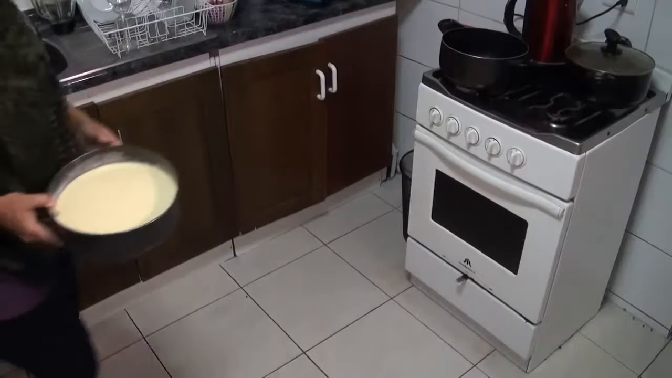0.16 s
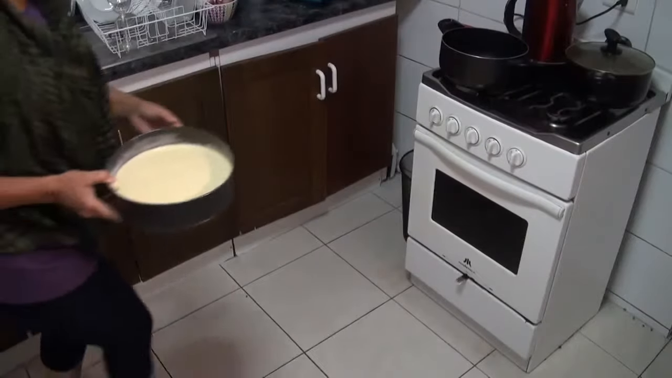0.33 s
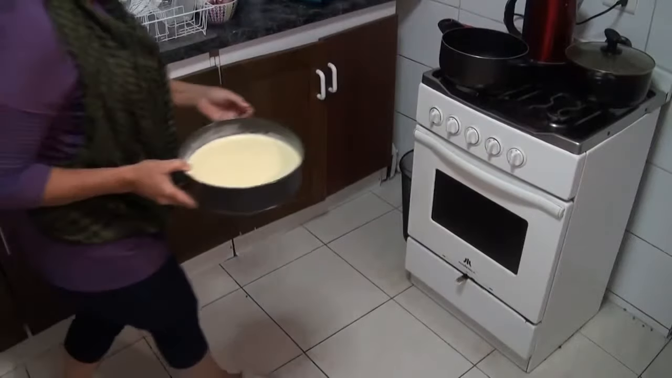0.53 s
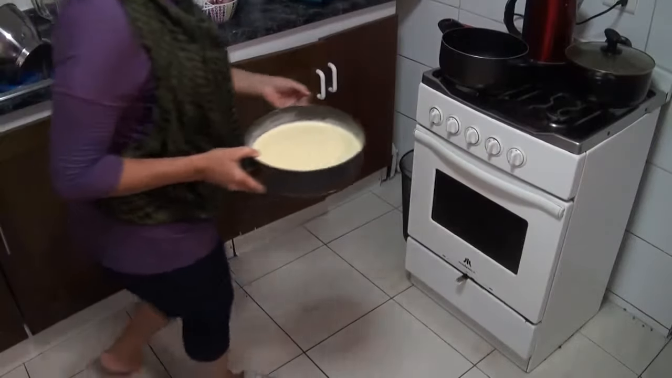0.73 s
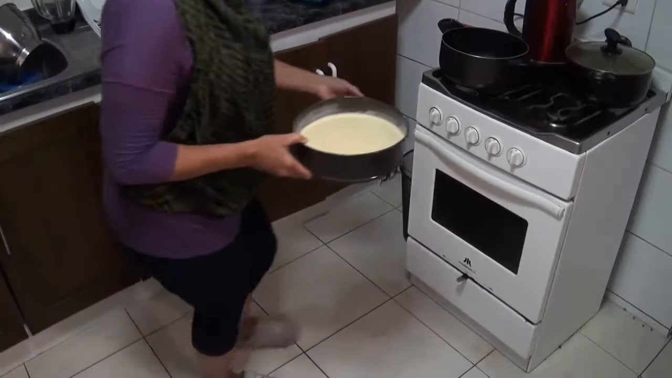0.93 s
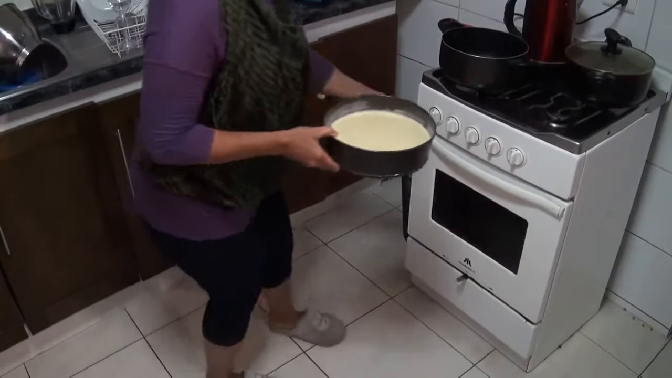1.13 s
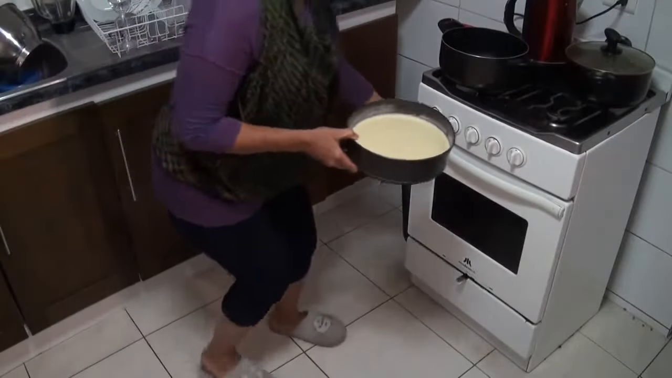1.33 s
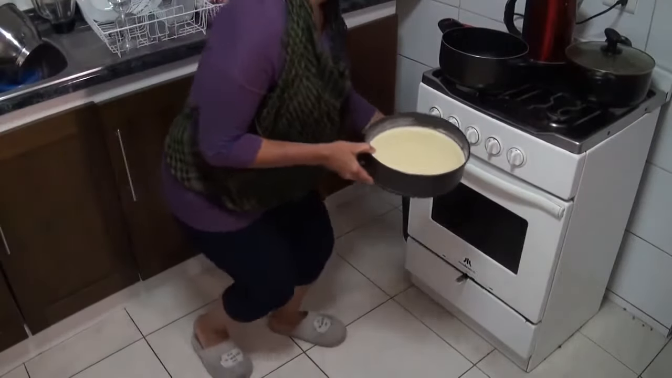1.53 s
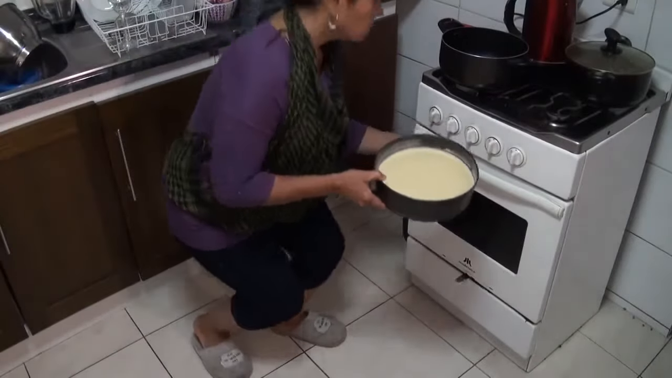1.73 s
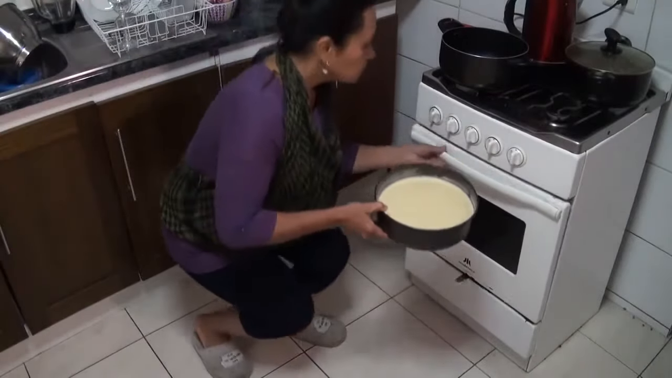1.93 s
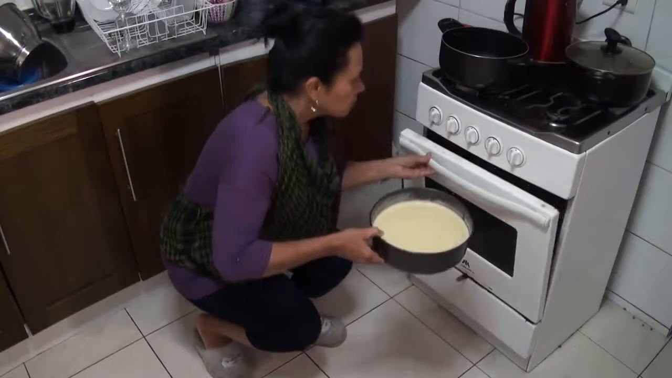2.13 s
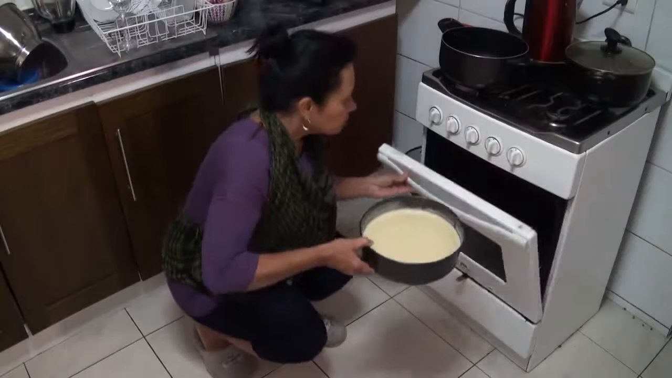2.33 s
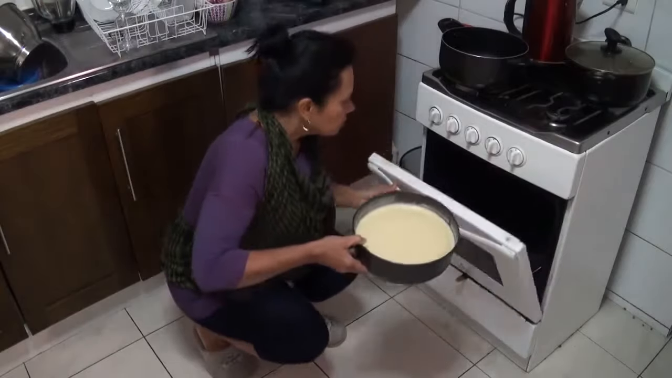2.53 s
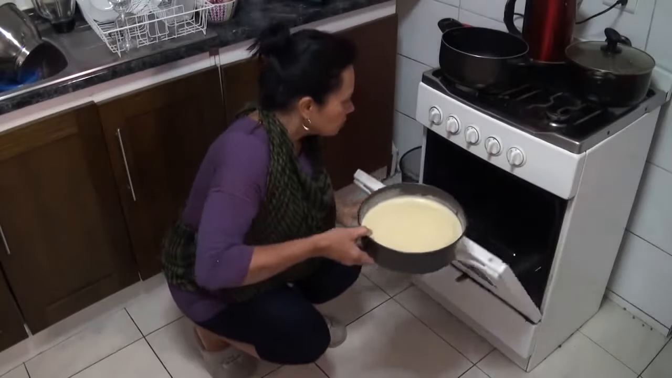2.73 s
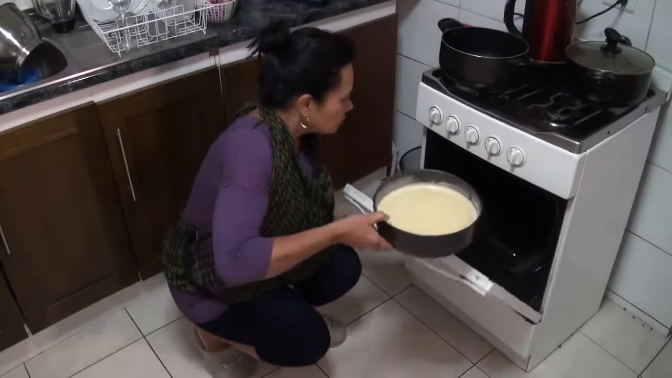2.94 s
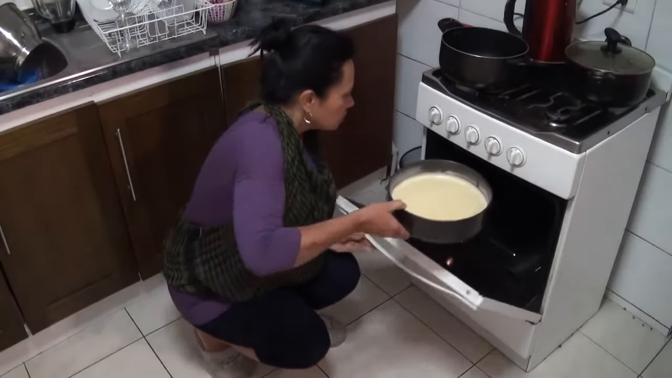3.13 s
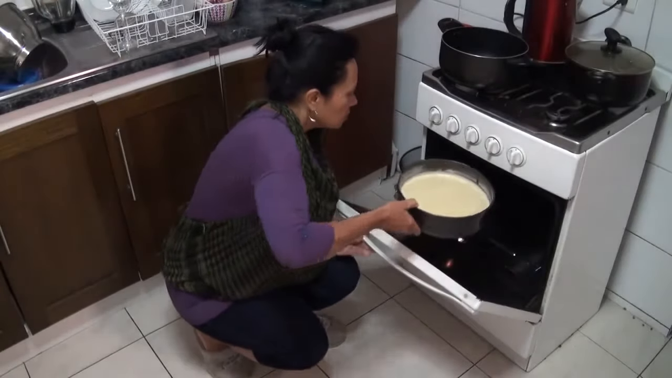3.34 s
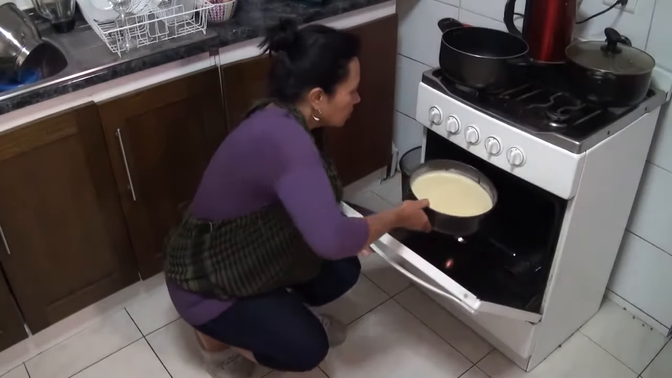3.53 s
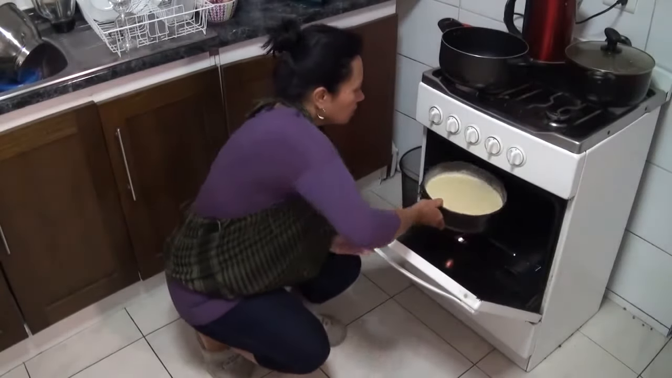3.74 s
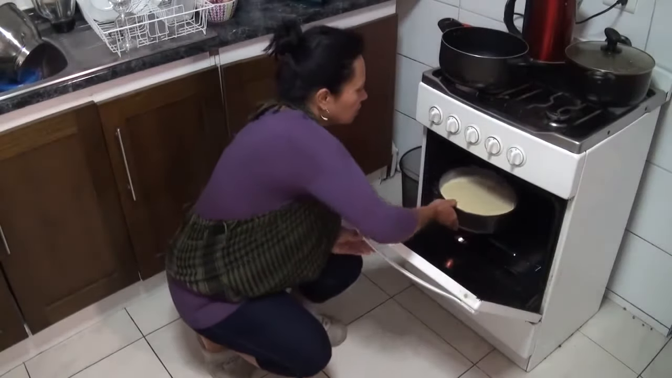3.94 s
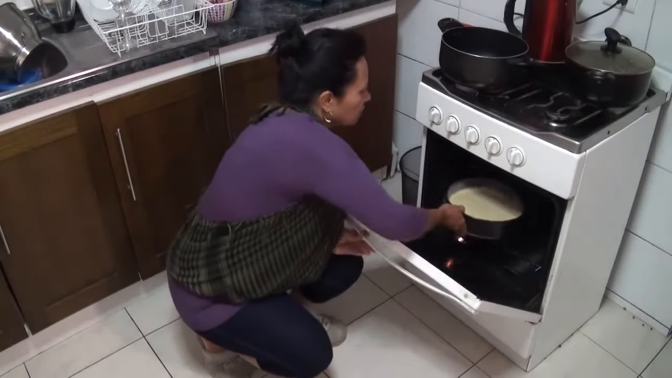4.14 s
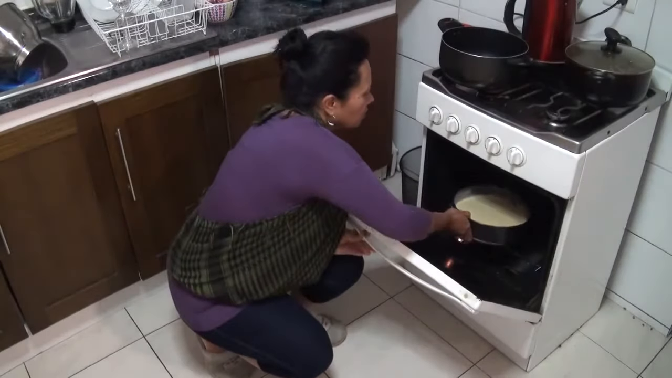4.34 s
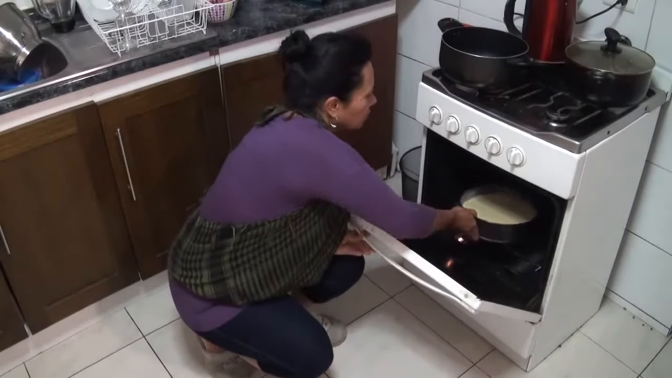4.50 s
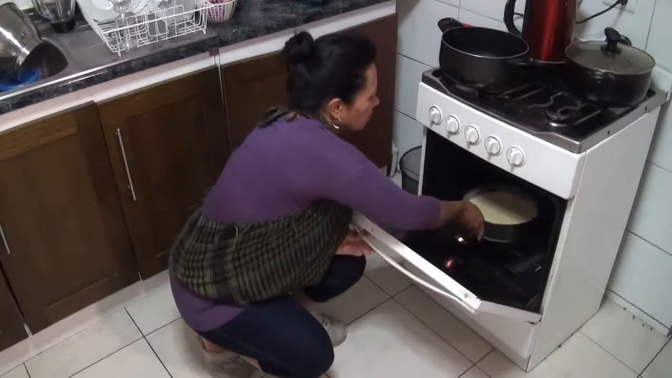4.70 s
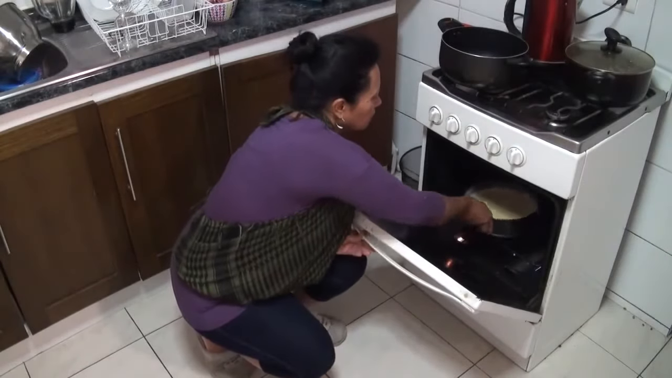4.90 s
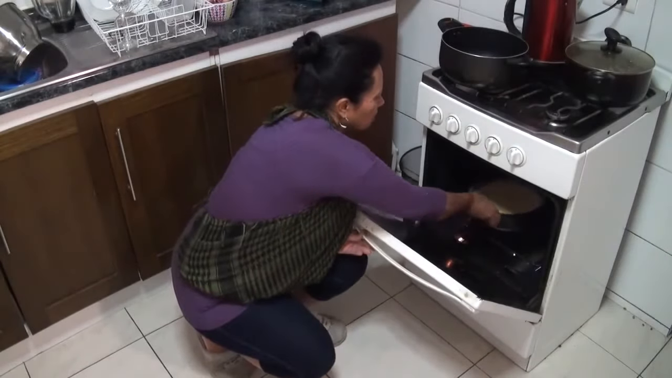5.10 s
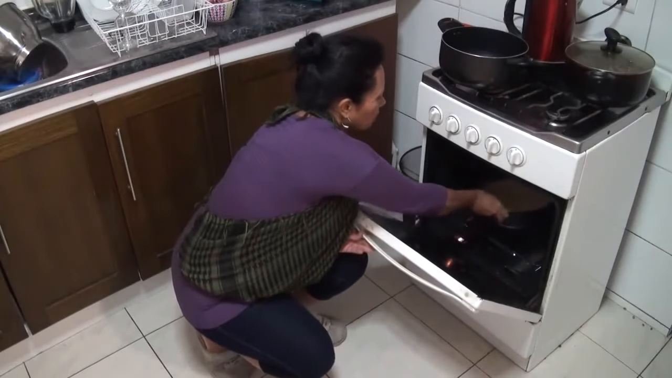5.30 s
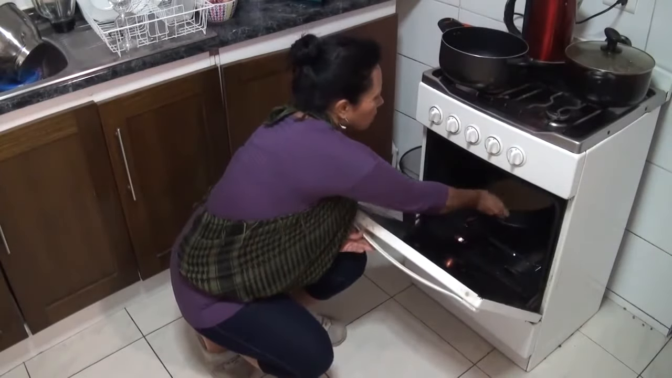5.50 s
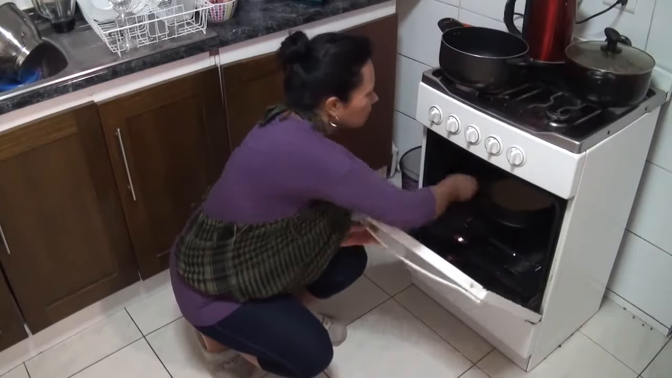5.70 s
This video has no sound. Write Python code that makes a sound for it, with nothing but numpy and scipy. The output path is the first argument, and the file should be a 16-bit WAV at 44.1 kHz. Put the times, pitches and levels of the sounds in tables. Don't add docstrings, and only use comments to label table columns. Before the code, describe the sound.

Gritty footsteps approach a stove, its dry oven hinge shrieks in broken bursts, and after a pause a cake pan knocks and grates along wire bars.

```python
import sys
import numpy as np
from scipy import signal
from scipy.fft import rfft, irfft, next_fast_len
from scipy.io import wavfile
from scipy.ndimage import uniform_filter1d

SR = 44100
rng = np.random.default_rng(int(sys.argv[2]) if len(sys.argv) > 2 else 0)


def volts_from_db(level):
    exponent = np.asarray(level, float) / 20
    return 10 ** exponent


def waveform_to_disk(signal):
    frames = np.transpose(np.atleast_2d(signal))
    scaled = np.clip(frames, -1, 1) * 32767
    samples = np.round(scaled).astype(np.int16)
    wavfile.write(sys.argv[1], SR, samples)


N = 258381
T = np.arange(N) / SR

# [f/Hz, level/dB per Hz]
AIR_HZ = [(12, -33), (20, -6.5), (55, -15.5), (76, -17.5), (141, -24), (209, -25.5), (317, -26), (431, -31),
          (693, -34), (1250, -35.5), (2000, -37.5), (3700, -39.5), (15800, -47.5)]
# [f/Hz, level/dB per Hz]
SIDE_HZ = [(12, -32.5), (20, 0.5), (123, -3.5), (419, -18), (1650, -40), (1790, -47.5), (2960, -36.5),
           (13700, -28), (15800, -27.5)]
# [t/s, level/dB]
GAIN = [(0, -62), (2.2, -59), (2.6, -59), (3.6, -63.5), (4.4, -64), (5.86, -60.5)]
# [f/Hz, t60/s]
ROOM = [(200, 0.38), (900, 0.38), (4000, 0.35), (9000, 0.31), (15000, 0.33)]

# [t/s, time to die 20 dB/s, floor level/dB, cabinet level/dB]
BOOM = [(.24, .5, -46, -57), (.645, .3, -33, -50), (.77, .2, -33, -54), (.94, .5, -37, -52),
        (1.15, .6, -44, -60), (1.45, .5, -52, -52), (1.68, .8, -44, -55), (2.0, .15, -45, -49),
        (2.25, .3, -46, -50), (2.4, .2, -35, -38), (2.58, .9, -42, -52), (3.0, .9, -49, -52),
        (3.5, .5, -58, -52), (3.87, .4, -50, -62), (4.92, .25, -42, -44), (5.14, .3, -49, -42),
        (5.5, .5, -48, -51), (5.84, .3, -46, -46)]
# [f/Hz, width/Hz]
BOOM_MODES = [(47, 2.7), (144, 6), (7, 5.9)]
# [start t/s, length/s, first f/Hz, last f/Hz, level/dB]
CABINET = [
    (.04, .18, 109.4, 108.4, -44),
    (.2, .12, 108.6, 108.8, -36),
    (.31, .16, 106.5, 104.5, -47),
    (0, .6, 270, 262, -56),
]
# [f/Hz, level under the note/dB]
PANEL = [(215, -22), (325, -36), (430, -50)]
LEAN_SHARE, DRIFT_DB = .4, -42

# [t/s, peak level/dB, f/Hz, ring t60/s]
PINGS = [
    (2.406, -26, 337.5, .15),
    (2.404, -26.5, 190.5, .2),
    (2.696, -27.5, 238.8, .5),
    (3.3, -30.5, 328, 0.2),
    (5.682, -36, 3270, 0.24),
    (5.754, -20.5, 306, 0.18),
    (5.759, -22.5, 404.6, 0.145),
    (5.769, -31, 260, .4),
]
# [t/s, peak level/dB, f/Hz, ring t60/s]
TICKS = [(.084, -25, 2600, .012), (.4693, -25, 2300, .012), (1.12, -32, 5000, .01), (1.242, -26, 2600, .01),
         (1.245, -27, 3600, .01), (1.2481, -16, 3500, .008), (1.2482, -17, 2600, .008),
         (1.307, -30, 6000, .012), (1.348, -25, 3100, .01), (1.4172, -26, 1700, .015),
         (1.5683, -30, 4500, .012), (1.8597, -26, 4450, .012), (4.4413, -17, 6200, .012),
         (4.7551, -11, 1830, .015), (5.684, -31, 2220, .012)]

# [peak t/s, 20 dB rise/s, 20 dB fall/s, level/dB, brightness/dB]
SCUFF = [(.105, .1, .15, -32, 3), (.175, .1, .12, -36, 3), (.33, .3, .4, -49, -3), (.48, .03, .3, -39, -3),
         (.6, .15, .1, -44, 0), (.668, .04, .12, -33, -5), (.78, .14, .22, -37, 6),
         (1.17, .12, .2, -50, 10), (1.245, .1, .06, -38, -8), (1.33, .07, .2, -42, 9),
         (1.44, .06, .1, -38, 3), (1.58, .04, .3, -45, 2), (1.64, .15, .2, -46, -6), (1.8, .3, .8, -49, 7),
         (2.16, .9, .2, -44, -4), (4.064, .03, .12, -57, 8)]
# [f/Hz, level/dB per Hz]
SCUFF_HZ = [(88, -28), (150, -3.5), (179, -15), (264, -3), (390, -10), (817, -5), (3320, -6.5), (5000, -13),
            (6000, -8), (6900, -15), (8470, -20), (15800, -30.5)]
# [t/s, peak level/dB, thud level/dB, fade t60/s, centre f/Hz]
SLAPS = [(.052, -35, -22, 0.12, 2480), (.469, -24, -27, 0.1, 2180), (.615, -30, -13, 0.079, 2600),
         (.655, -22, -15, 0.088, 1260), (1.12, -29, -22, 0.035, 4130), (1.248, -22, -1, 0.06, 2600),
         (1.307, -30, -20, .15, 6000), (1.345, -33, -20, 0.042, 4000), (1.417, -26, -24, 0.16, 2360),
         (1.568, -27, -21, 0.043, 2300), (1.86, -30, -13, 0.038, 4130), (4.057, -44.5, -13, .08, 5000),
         (4.095, -36, -18, 0.11, 12100)]

# [peak t/s, 20 dB rise/s, 20 dB fall/s, level/dB, brightness/dB]
SLIDE = [
    (4.444, .004, .03, -27, 15),
    (4.46, .015, .3, -26, -1),
    (4.6, .3, .4, -33, 0),
    (4.685, .08, .12, -27, -2),
    (4.757, .006, .04, -17, 8),
    (4.774, .02, .13, -13.5, -3),
    (4.96, .25, .9, -25, 4),
    (5.3, .6, 1.2, -29, 1),
    (5.57, 1.2, .5, -29, 1),
]
# [peak t/s, 20 dB rise/s, 20 dB fall/s, level/dB, brightness/dB]
SETTLE = [
    (5.66, .1, .2, -38, -8),
    (5.73, .1, .06, -36, -8),
    (5.76, .02, .2, -36, -16),
]
# [f/Hz, level/dB per Hz]
SLIDE_HZ = [(59, -39), (100, -15.5), (200, -10), (270, -4.5), (520, -5.5), (800, -6.5), (1850, -6.5),
            (3070, -13), (8000, -22), (8600, -34.5), (12000, -32), (15600, -41)]
# [f/Hz, width/Hz, level/dB]
PAN = [(243, 49, 0.5), (525.4, 20, -5), (665, 12, -2.5), (1103, 43, -15), (1900, 130, -12.5), (2694, 77, 0),
       (3550, 230, -22), (4030, 55, -9), (6080, 350, -5), (7700, 200, -5), (12700, 300, -14)]
# [f/Hz, level/dB, t60/s]
RING = [(567, -34, 4.8), (1170, -11, 0.3), (1440, -16, 0.95), (1820, -9, 0.3), (2090, -8, 1.2),
        (2340, -6, 1.7), (2541, -37, 0.5), (2649, -19, 0.39), (3009, -16, 1.8), (3397, -9, 0.28),
        (4140, -8, 0.48), (5814, -15, 0.41)]
# [t/s, peak level/dB, thud level/dB, fade t60/s, centre f/Hz]
KNOCKS = [
    (4.441, -24, -30, .22, 3440),
    (4.681, -12.5, -15, .2, 2020),
    (4.754, -15, -8, 0.35, 2200),
    (4.922, -22, -13, 0.3, 2800),
    (5.532, -26, -4, 0.6, 1930),
    (5.683, -29, -20, 0.11, 3120),
    (5.754, -26, -3, 0.14, 1500),
    (4.442, -29, -28, 0.087, 11000),
    (4.751, -21, -30, 0.07, 11000),
]
# [peak t/s, 20 dB rise or fall/s, level/dB]
RACK = [
    [(4.5, .1, -43), (4.79, .1, -38), (5.27, .09, -33), (5.3, .08, -34), (5.49, .08, -32),
     (5.535, .07, -31), (5.63, .08, -35), (5.67, .08, -36)],
    [(4.64, .15, -39), (4.69, .1, -39), (4.81, .08, -36), (5.17, .1, -31), (5.23, .1, -30), (5.45, .2, -42),
     (5.85, .15, -35)],
    [(4.78, .1, -34), (4.87, .1, -33), (4.92, .1, -30), (5.02, .08, -35), (5.09, .06, -36),
     (5.29, .06, -38), (5.43, .08, -39), (5.63, .1, -37), (5.71, .08, -38)],
    [(4.5, .15, -40), (4.7, .12, -35), (4.95, .1, -36), (5.07, .15, -34), (5.36, .1, -44), (5.58, .12, -37)],
    [(5.01, .1, -37), (5.14, .12, -34), (5.5, .08, -39), (5.62, .08, -39)],
]
# [f/Hz, width/Hz]
RACK_MODES = [(182, 12), (256, 11), (528, 19), (1930, 60), (420, 18)]
LANDS_S, LIFTS_S, LIFT_DB_PER_S = 4.441, 5.6, -260

# [peak t/s, 20 dB rise/s, 20 dB fall/s, level/dB, brightness/dB]
DOOR = [(2.27, .25, .1, -45, 4), (2.345, .03, .25, -33, 1), (2.385, .05, .12, -35, 0),
        (2.414, .1, .1, -33, -5), (2.455, .05, .08, -34, -2), (2.58, .3, .3, -42, 0),
        (2.71, .1, .3, -41, -2), (2.9, .3, .3, -43, 3), (3.06, .2, .2, -47, 7), (3.22, .2, .1, -58, 11),
        (3.33, .1, .15, -52, -5), (3.45, .3, .4, -57, -5)]
# [f/Hz, level/dB per Hz]
DOOR_LOW = [(35, -43), (60, -9.5), (194, -9.5), (237, 1), (314, -5), (786, -15), (829, -4), (1500, -20),
            (1950, -52), (3300, -120)]
# [f/Hz, level/dB per Hz]
DOOR_MID = [(590, -51), (1000, -12.5), (1130, -21), (3500, -12), (4460, -12.5), (4780, -25.5), (9010, -49),
            (15000, -47.5)]

# [start t/s, length/s, first f/Hz, last f/Hz, level/dB]
SQUEALS = [(2.375, .07, 4395, 4405, -19), (2.52, .09, 4400, 4402, -43), (2.685, .035, 5240, 5220, -34),
           (2.74, .05, 5190, 5190, -33), (2.812, .036, 3455, 3495, -6), (2.84, .074, 3545, 3585, -14),
           (2.858, .057, 3830, 3790, -14), (3.012, .03, 4070, 4200, -21), (3.02, .05, 4020, 4045, -11),
           (3.058, .045, 4200, 4290, -12), (3.082, .048, 3870, 3960, -17)]
# [t/s, f/Hz, level/dB]
GLIDES = [
    [(2.208, 4170, -34), (2.222, 4225, -9), (2.25, 4265, -6), (2.275, 4350, -8), (2.295, 4415, -8),
     (2.335, 4405, -9), (2.352, 4400, -30)],
    [(3.098, 4330, -30), (3.115, 4335, -11), (3.15, 4300, -16), (3.185, 4400, -10), (3.22, 4480, -11),
     (3.25, 4570, -12), (3.272, 4765, -11), (3.325, 4755, -9), (3.35, 4755, -32)],
]
# [f/Hz, level under the note/dB]
JOINT = [(7000, -11), (7650, -17), (8050, -4), (8600, -15), (9500, -12), (10800, -32), (12300, -14),
         (15800, -50)]
# [t/s, level/dB]
BITE = [(2.3, -7), (2.9, -4), (3.04, 6), (3.2, 4), (3.33, -4)]
# [start t/s, length/s, first f/Hz, last f/Hz, level/dB]
HOOTS = [
    (2.275, .08, 860, 840, -31),
    (2.322, .062, 826, 852, -10),
    (2.36, .087, 848, 828, -8),
    (2.435, .12, 942, 952, -5),
    (2.54, .08, 955, 985, -24),
]
# [f/Hz, level under the note/dB]
COIL = [(1680, -22), (1900, -26), (2520, -30), (2850, -40), (3500, -38)]
# [f/Hz, t60/s, level/dB]
DOOR_RING = [(838, 1.2, -7), (997, .5, -24), (4640, .4, -20), (4762, .36, -16), (1695, .4, -4),
             (1897, .7, -2), (2505, .5, -2), (2848, .7, 0)]
HOOT_ROOM_DB = -11
EDGE_HZ = 15850


def evened(x):
    return x / np.sqrt(np.mean(x ** 2) + 1e-20)


def read(points, hz):
    f, value = np.transpose(points)
    return np.interp(np.log(hz + 1), np.log(f + 1), value)


def band(x, lo_hz, hi_hz):
    edges = [lo_hz, min(hi_hz, SR * .45)]
    return signal.sosfilt(signal.butter(2, edges, "band", fs=SR, output="sos"), x)


def coloured(x, spectrum, patchy_db):
    hz, _, z = signal.stft(x, SR, nperseg=1024)
    patches = uniform_filter1d(rng.standard_normal(z.shape), size=8, axis=0)
    patches = evened(uniform_filter1d(patches, size=5, axis=1))
    gain = volts_from_db(read(spectrum, hz)[:, None] + patchy_db * patches)
    return evened(signal.istft(z * gain, nperseg=1024)[1][:N])


def grit(per_s, spread_db):
    size = volts_from_db(spread_db * np.minimum(rng.exponential(1, N), 4))
    return size * rng.standard_normal(N) * (rng.random(N) < per_s / SR)


def resonate(x, hz, width):
    r = np.exp(-np.pi * width / SR)
    pole = r * np.exp(2j * np.pi * hz / SR)
    return 2 * signal.lfilter([1 - r], [1, -pole], x).real


def thirds(x, gains, low_hz, high_hz):
    size = next_fast_len(N)
    hz, z = np.fft.rfftfreq(size, 1 / SR), rfft(x, size)
    low = 1 / (1 + (hz / low_hz) ** 2)
    high = 1 / (1 + (high_hz / (hz + 1)) ** 2)
    shares = (1 - low - high, low, high)
    return sum(g * evened(irfft(z * share, size)[:N]) for g, share in zip(gains, shares))


def swells(peak, rise, fall, db):
    late = T[::32, None] - peak
    each = volts_from_db(db - 20 * np.maximum(late / fall, -late / rise))
    return np.interp(T, T[::32], np.linalg.norm(each, axis=1))


def strokes(rows, low_db, high_db):
    peak, rise, fall, db, bright_db = np.transpose(rows)
    parts_db = (db, db + low_db - bright_db, db + high_db + bright_db)
    return [swells(peak, rise, fall, d) for d in parts_db]


def bursts(rows, source, tick_db, thud_hz):
    out, t = np.zeros(N + SR), T[:SR // 2]
    source = np.tile(source, 2)
    low = evened(band(source, thud_hz * 0.9, thud_hz * 0.91))
    for s, db, low_db, fade, hz in rows:
        on = slice(round(s * SR), round(s * SR) + len(t))
        tick = volts_from_db(tick_db - 60 * t / 0.022)
        rattle = (1 - np.exp(-t / 0.002)) * (volts_from_db(-60 * t / fade) + tick)
        thud = (1 - np.exp(-t / 0.0056)) * volts_from_db(low_db - 60 * t / fade)
        colour = evened(0.5 * source[on] + band(source[on], hz * 0.62, hz * 1.5))
        out[on] += volts_from_db(db - 13) * (rattle * colour + thud * low[on])
    return out[:N]


def hum(gains, modes):
    out = np.zeros(N)
    for gain, (hz, width) in zip(gains, modes):
        stir = rng.standard_normal(N)
        waver = 0.45 * width * evened(uniform_filter1d(stir, size=4000))
        note = np.sin(2 * np.pi * np.cumsum(hz + waver) / SR)
        noise = evened(resonate(resonate(stir, hz, width), hz, width))
        out += gain * (1.25 * note + 0.45 * noise)
    return out


def unsteadiness(wobble):
    return wobble * evened(uniform_filter1d(rng.standard_normal(N), size=300))


def stick_slip(rows, overtones, wobble, attack_s, release_s, bite=((0, 0),)):
    out, unsteady = np.zeros(N), unsteadiness(wobble)
    for s, length, first_hz, last_hz, db in rows:
        on = slice(round(s * SR), round((s + length) * SR))
        t = T[on] - T[on][0]
        hz = first_hz + (last_hz - first_hz) * t / length
        turn = 2 * np.pi * np.cumsum(hz * (1 + unsteady[on])) / SR
        grip = np.sin(np.pi / 2 * np.clip(np.minimum(t / attack_s, (length - t) / release_s), 0, 1))
        bite_db = np.interp(s, *np.transpose(bite))
        upper = sum(volts_from_db(read(overtones, k * hz) + bite_db) * np.sin(k * turn) for k in range(2, 5))
        tone = grip * (np.sin(turn) + volts_from_db(-6 * t / length) * upper)
        out[on] += np.sqrt(2) * volts_from_db(db) * grip * tone
    return out


def room(x):
    at = np.arange(200, SR - 20, 20)
    taps = np.zeros(SR)
    taps[at + rng.integers(0, 20, len(at))] = rng.choice([-1., 1.], len(at))
    hz, t, z = signal.stft(taps, SR, nperseg=256)
    fade = volts_from_db(-60 * t / read(ROOM, hz)[:, None])
    tail = signal.istft(z * fade, SR, nperseg=256)[1]
    return signal.fftconvolve(x, tail / np.linalg.norm(tail))[:N]


def hiss():
    gain = volts_from_db(np.interp(T, *np.transpose(GAIN))) / volts_from_db(-65.5)
    air = volts_from_db(-50) * gain * coloured(rng.standard_normal(N), AIR_HZ, patchy_db=0.4)
    side = volts_from_db(-63.5) * gain * coloured(rng.standard_normal(N), SIDE_HZ, patchy_db=3.8)
    return air, side


def boom():
    s, fall, *dbs = np.transpose(BOOM)
    steps = [swells(s, LEAN_SHARE * fall, fall, db) for db in dbs]
    pressure = volts_from_db(DRIFT_DB) + 0.8 * steps[0]
    panel = stick_slip(CABINET, PANEL, wobble=.004, attack_s=.06, release_s=.05)
    return hum(steps + [pressure], BOOM_MODES) + panel


def pings(rows, start_s):
    out = np.zeros(N)
    for s, db, hz, t60 in rows:
        on = slice(round(s * SR), round((s + 1.5 * t60) * SR))
        t = T[on] - T[on][0]
        out[on] += volts_from_db(db - 60 * t / t60) * (1 - np.exp(-t / start_s)) * np.sin(2 * np.pi * hz * t)
    return out


def slippers():
    sole = coloured(grit(14000, 2.1), SCUFF_HZ, patchy_db=2.1)
    drag = thirds(sole, strokes(SCUFF, low_db=-6, high_db=-5), 800, 4000)
    return volts_from_db(-2.0) * drag + bursts(SLAPS, sole, tick_db=10.5, thud_hz=457.5)


def pan_body(rub):
    body = np.zeros(N)
    for hz, width, db in PAN:
        wander = evened(np.interp(T, np.linspace(0, T[-1], 60), rng.standard_normal(60)))
        body += volts_from_db(db + 2.8 * wander) * evened(resonate(rub, hz, width))
    return evened(body)


def pan():
    rub = grit(30000, 1.4)
    scrape = evened(coloured(rub, SLIDE_HZ, patchy_db=2.5) + 0.22 * pan_body(rub))
    knocks = bursts(KNOCKS, scrape, tick_db=-6.5, thud_hz=448)
    ring = sum(volts_from_db(db) * resonate(knocks, hz, 2.2 / min(t60, .45)) for hz, db, t60 in RING)
    touch = T > LANDS_S
    push = touch * volts_from_db(LIFT_DB_PER_S * np.maximum(T - LIFTS_S, 0))
    pushed = strokes(SLIDE, low_db=-6.5, high_db=-7.5)
    settling = strokes(SETTLE, low_db=-8, high_db=-9)
    gains = [push * a + b for a, b in zip(pushed, settling)]
    slide = volts_from_db(-1.2) * thirds(scrape, gains, 660, 4800)
    catches = [swells(s, width, width, db) for s, width, db in map(np.transpose, RACK)]
    return slide + knocks + volts_from_db(2) * ring + volts_from_db(3) * touch * hum(catches, RACK_MODES)


def door():
    mid, low, high = strokes(DOOR, low_db=6, high_db=-2.5)
    rumble = coloured(rng.standard_normal(N), DOOR_LOW, patchy_db=2.5)
    rub = coloured(grit(6000, 2.3), DOOR_MID, patchy_db=4.0)
    return low * rumble + volts_from_db(4) * mid * rub + high * evened(band(rub, 5200, 7600))


def glides(wobble):
    out, unsteady = np.zeros(N), unsteadiness(wobble)
    for s, pitch, db in map(np.transpose, GLIDES):
        on = (T > s[0]) & (T < s[-1])
        hz = np.interp(T[on], s, pitch)
        turn = 2 * np.pi * np.cumsum(hz * (1 + unsteady[on])) / SR
        bite = volts_from_db(-1.5 + np.interp(T[on], *np.transpose(BITE)))
        upper = sum(volts_from_db(read(JOINT, k * hz)) * np.sin(k * turn) for k in range(2, 5))
        out[on] = np.sqrt(2) * volts_from_db(np.interp(T[on], s, db)) * (np.sin(turn) + bite * upper)
    return out


def hinge():
    hoot = stick_slip(HOOTS, COIL, wobble=0.013, attack_s=.04, release_s=.035)
    squeal = stick_slip(SQUEALS, JOINT, wobble=0.0075, attack_s=.019, release_s=.014, bite=BITE)
    squeal = squeal + glides(wobble=.006)
    squeal = squeal * (1 + 0.11 * np.tanh(7 * hoot))
    rings = sum(volts_from_db(db) * resonate(hoot + squeal, hz, 1.9 / t60) for hz, t60, db in DOOR_RING)
    return hoot, squeal, rings


def scene():
    air, side = hiss()
    hoot, squeal, rings = hinge()
    struck = pings(PINGS, start_s=.0023) + pings(TICKS, start_s=.0002)
    rubbing = slippers() + pan() + door() + struck
    sent = squeal + volts_from_db(HOOT_ROOM_DB) * hoot + volts_from_db(-7.0) * rubbing
    near = volts_from_db(0.5) * (hoot + squeal + rings) + volts_from_db(-2.5) * rubbing
    middle = near + volts_from_db(-2) * room(sent) + boom() + air
    side = side + volts_from_db(-36) * room(sent) - volts_from_db(-35) * (hoot + squeal)
    return np.array([middle + side, middle - side])


def top_cut(x):
    return signal.sosfilt(signal.butter(12, 16690, fs=SR, output="sos"), x)


def record(dry):
    limited = 0.89 * dry / (1 + (0.93 * dry) ** 6) ** (1 / 6)
    edge = signal.firwin(511, EDGE_HZ, fs=SR)[None]
    mix = signal.oaconvolve(limited, edge, "same")
    return top_cut(mix)


dry = scene()
out = record(dry)
waveform_to_disk(out)
```